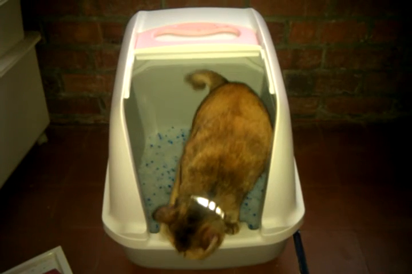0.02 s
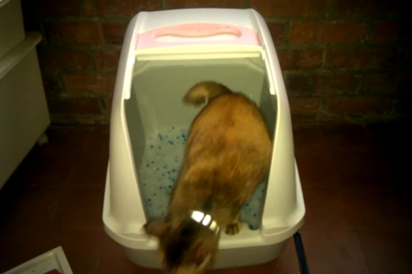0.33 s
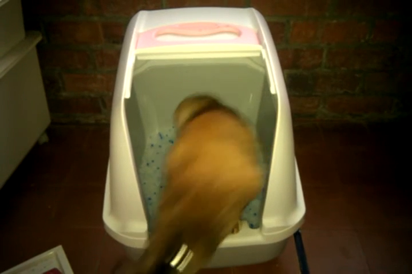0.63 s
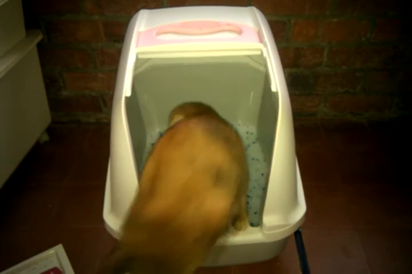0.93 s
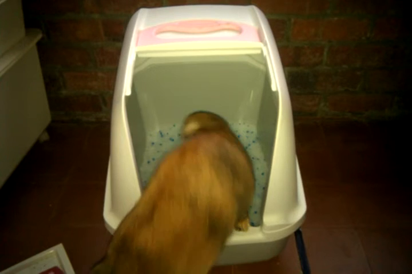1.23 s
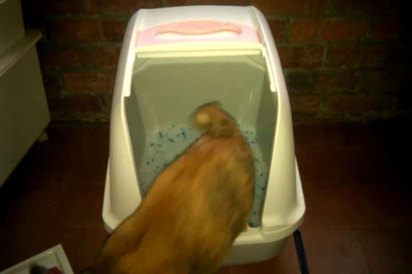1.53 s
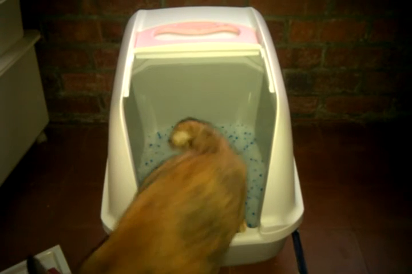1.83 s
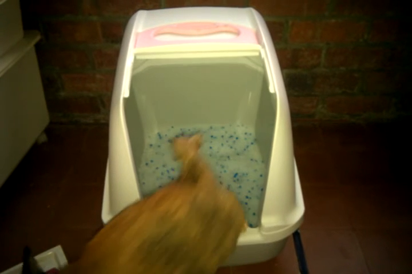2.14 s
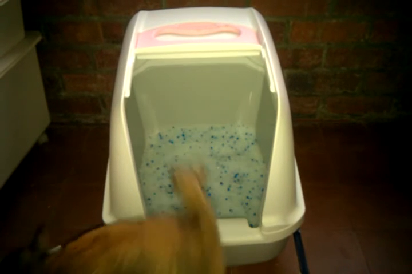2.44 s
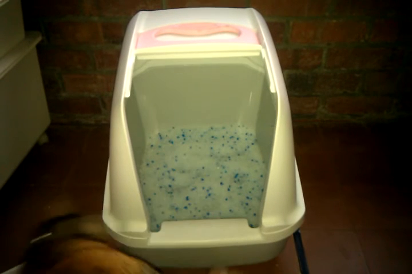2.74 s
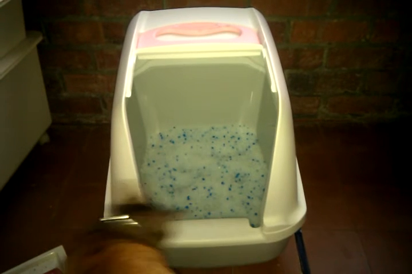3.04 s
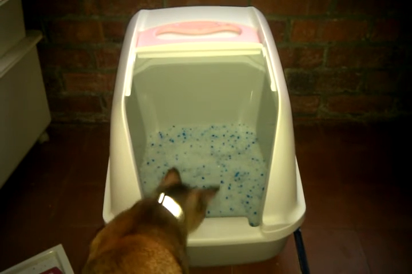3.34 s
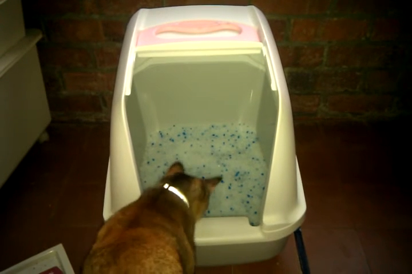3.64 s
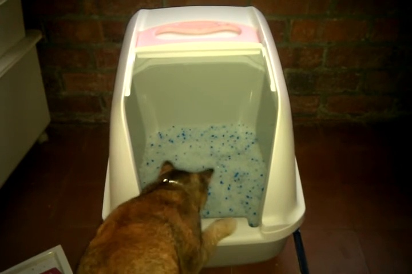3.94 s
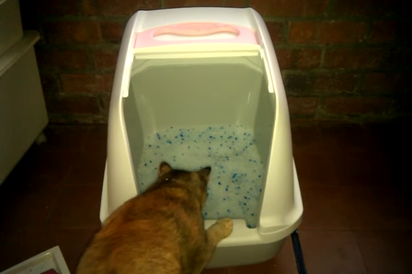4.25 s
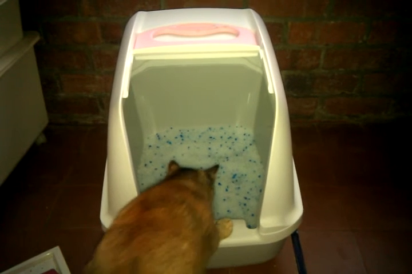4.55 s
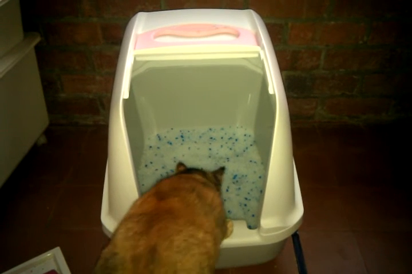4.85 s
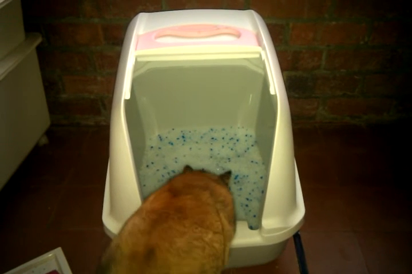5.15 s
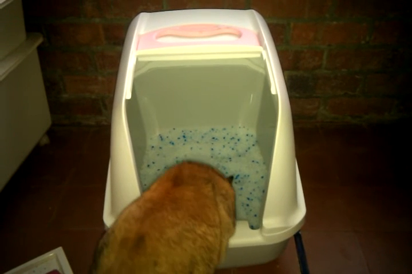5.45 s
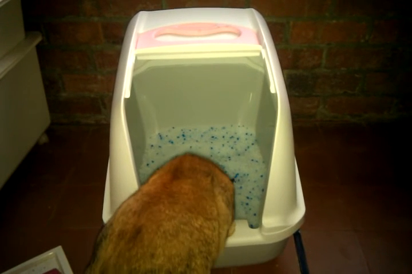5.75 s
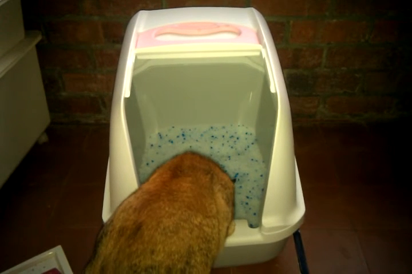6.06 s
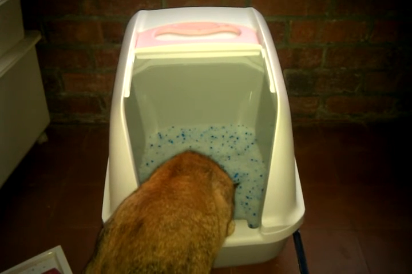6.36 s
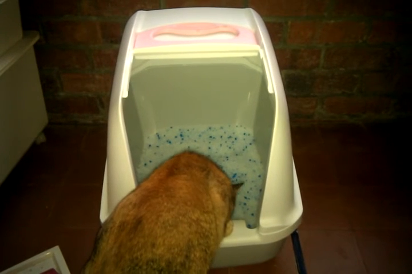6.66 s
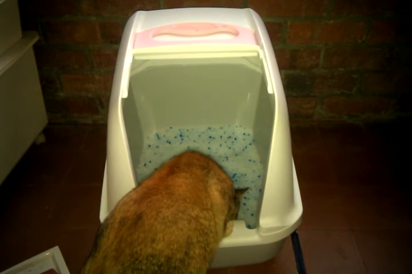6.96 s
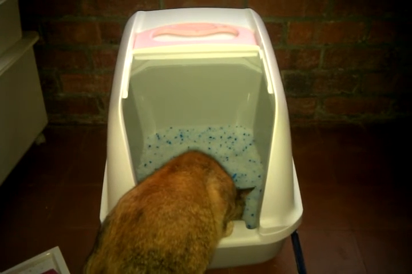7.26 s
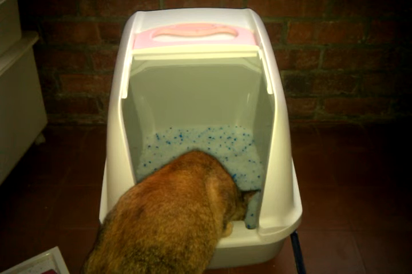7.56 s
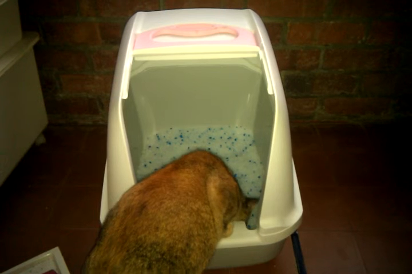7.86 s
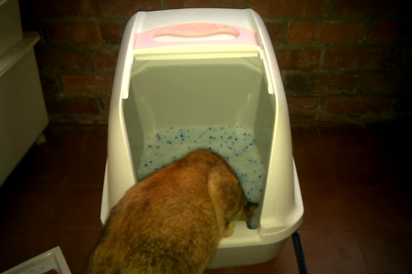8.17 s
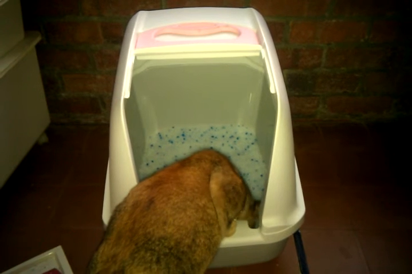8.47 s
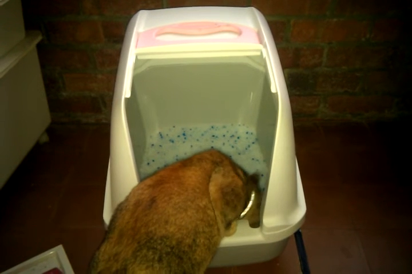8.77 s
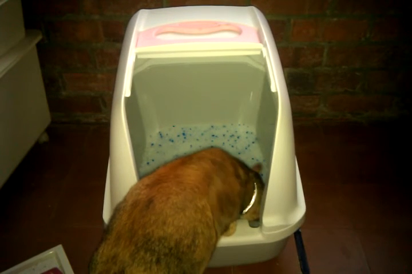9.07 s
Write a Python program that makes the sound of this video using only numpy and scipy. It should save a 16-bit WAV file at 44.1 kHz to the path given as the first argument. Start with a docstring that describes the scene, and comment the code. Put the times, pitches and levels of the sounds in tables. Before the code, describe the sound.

Litter crunches under a cat's paws, then a plastic tray knocks softly and claws rake it with a loud squeaky scrape, over a low hum.

```python
"""Cat litter crunches and ticks close by as a cat steps out through a hooded plastic box.
Granules rub and crack under its paws and echo in the hood; its fur brushes the rim. It turns round,
noses the tray, which knocks softly, and at the end rakes a paw along the wall, claws squeaking.
Behind it something like a fan hums in the room. The sound is mono, narrow and voice-band,
and the last, loudest stroke clips with a crackle."""
import sys
import numpy as np
from scipy import signal
from scipy.fft import rfft, irfft, next_fast_len
from scipy.io import wavfile
from scipy.ndimage import uniform_filter1d, minimum_filter1d, map_coordinates

SR = 44100
rng = np.random.default_rng(int(sys.argv[2]) if len(sys.argv) > 2 else 0)


def int16_out(signal):
    """Quantize to a 16-bit WAV file."""
    q = np.round(np.clip(np.atleast_2d(signal).T, -1, 1) * 32767)
    wavfile.write(sys.argv[1], SR, q.astype(np.int16))


N = 401751

# Levels are relative within each table.
# room tone, a steady rush of air: freq_hz, level_db
AIR_SPECTRUM = [(25, -27), (75, -12), (170, -9.5), (205, -1.5), (345, -1.5), (450, 3.5), (590, -1),
                (720, 0.5), (1030, 0), (1300, -5.5), (1700, -7), (2400, -9.5), (2850, -15), (3300, -16)]
# narrow bands of the hum: centre_hz, width_hz, level_db
HUM_BANDS = [(200.7, 11, -10), (213.9, 9.7, -2.5), (256.5, 17, -3.5), (300.5, 13, 2), (447.3, 8.6, -8),
             (512.4, 14, -5), (671.6, 36, -5)]
# the hum swells briefly: peak_s, level_db, rise_s, fall_s
HUM_SWELLS = [(3.92, -44.5, 0.25, 0.19), (5.7, -47.5, 1, 0.94), (7.57, -41, 0.25, 0.27)]
# the hum's strongest tone swells: peak_s, level_db, rise_s, fall_s
DRONE_SWELLS = [(1.36, -48, 0.27, 0.96), (2.72, -49.5, 0.94, 0.86)]
# fur over the rim as the cat climbs out: peak_s, level_db, rise_s, fall_s
FUR_BRUSHES = [(1.28, -43, 0.3, 0.33), (1.75, -43.5, 0.31, 0.36), (2.15, -44, 0.36, 0.42),
               (2.85, -45.5, 0.3, 0.27)]
# its hollow colour in the mouth of the hood: freq_hz, level_db
FUR_SPECTRUM = [(200, -26.5), (550, -15.5), (670, 4), (780, -5.5), (1050, -3), (1400, -11), (3500, -31.5)]
# the cat's weight coming down on the tray: start_s, level_db
PAW_THUDS = [(0.263, -37), (0.43, -47), (0.55, -57), (0.984, -45.5)]
# soft bumps against the tray: start_s, level_db
TRAY_KNOCKS = [(1.197, -31.5), (5.328, -30.5), (5.409, -37), (5.428, -26.5), (5.445, -29), (5.487, -19.5),
               (8.828, -22)]
# the tray's modes: pitch_hz, level_db, t60_s
TRAY_MODES = [(714, -4.5, 0.066), (795, -1.5, 0.028), (940, -6, 0.041), (1440, -10, 0.027),
              (1740, -17, .03)]
# claws squeaking on plastic: start_s, level_db, length_s, start_hz, end_hz
CLAW_SQUEAKS = [(8.865, -23, 0.022, 2640, 2730), (8.914, -10, 0.016, 1913, 1960),
                (8.943, -14, 0.02, 1990, 1950), (8.962, -10.5, 0.025, 1544, 1720),
                (8.984, -14, 0.042, 1960, 1870), (9.041, -15, 0.02, 2680, 2560),
                (9.063, -19, 0.01, 1500, 1590)]
# force of the paw raking the wall: time_s, level_db
RAKE_FORCE = [(8.832, -37.5), (8.862, -26), (8.886, -15), (8.905, -13.5), (8.935, -9.5), (8.96, -4),
              (8.987, -4.5), (9.018, -11.5), (9.048, -10.5), (9.07, -15), (9.09, -10), (9.11, -16)]
# colour of claws on plastic: freq_hz, level_db
SCRAPE_SPECTRUM = [(30, -24), (100, -18.5), (500, -14), (750, -4), (1000, -6), (1250, -6.5), (1500, 1),
                   (2200, -0.5), (2800, 1), (3600, 3), (4000, 0.5)]
# resonances of the scraped wall: centre_hz, width_hz, level_db
WALL_RESONANCES = [(790, 49, -12.5), (1480, 160, -3.5), (1614, 60, -3), (1943, 84, 0), (2483, 57, 0.5),
                   (2900, 85, -9), (3280, 58, -11)]
# single granules cracking: start_s, level_db, pitch_hz, t60_s
GRANULE_SNAPS = [(0.271, -20, 3000, 0.016), (0.342, -22, 2040, 0.018), (0.4176, -15, 1840, 0.035),
                 (0.507, -17, 3210, 0.045), (0.531, -15, 2400, 0.02), (0.5635, -13, 1790, 0.012),
                 (0.5727, -16.5, 1676, 0.046), (0.576, -16, 3230, 0.03), (0.5983, -13.5, 3060, 0.012),
                 (0.616, -18, 2210, 0.013), (0.697, -25.5, 2150, 0.02), (0.8664, -26.5, 3120, 0.025),
                 (0.8939, -26, 1950, 0.032), (0.951, -23.5, 2810, 0.02), (1.0035, -28, 1920, 0.022),
                 (1.0167, -18, 3210, 0.019), (1.0292, -16, 1880, 0.0107), (1.1992, -20.5, 1760, 0.0069),
                 (1.3553, -27.5, 3000, 0.027), (5.327, -32.5, 3220, 0.018)]
# a paw or the nose presses into the litter and eases off: peak_s, level_db, rise_s, fall_s
LITTER_PUSHES = [(0.052, -39.5, 0.092, 0.13), (0.2, -26.5, 0.054, 0.19), (0.268, -20, 0.048, 0.085),
                 (0.348, -25.5, 0.033, 0.08), (0.422, -19.5, 0.056, 0.14), (0.512, -21, 0.062, 0.13),
                 (0.575, -19.5, 0.06, 0.11), (0.66, -33.5, 0.033, 0.079), (0.704, -32.5, 0.035, 0.11),
                 (0.875, -34.5, 0.14, 0.25), (0.962, -31.5, 0.05, 0.049), (1.031, -23.5, 0.049, 0.042),
                 (1.07, -40, 0.047, 0.31), (1.36, -36.5, 0.25, 0.22), (1.59, -42.5, 0.076, 0.2),
                 (2.355, -35, 0.031, 0.037), (7.06, -48, 0.027, 0.13), (7.24, -48.5, 0.14, 0.15),
                 (7.655, -47.5, 0.044, 0.032)]
# clumps giving way and loose granules landing: start_s, level_db, t60_s
CLUMP_CRUNCHES = [(0.047, -18.5, 0.08), (0.257, -25, 0.1), (0.401, -7.5, 0.097), (0.442, -5.5, 0.092),
                  (0.4945, -16.5, 0.066), (0.529, -16, 0.05), (0.561, -7, 0.038), (0.591, -12, 0.037),
                  (0.617, -16, 0.05), (0.9492, -21.5, 0.066), (1.0046, -27, 0.06), (1.027, -20, 0.059),
                  (1.197, -17.5, 0.014), (1.351, -22, 0.051), (1.584, -22.5, 0.059), (5.3234, -22, 0.043),
                  (8.828, -7.5, 0.019)]
# colour of the granules: freq_hz, level_db
LITTER_SPECTRUM = [(30, -26), (120, -12.5), (300, -19.5), (550, -3.5), (800, -2), (1200, -3.5), (1800, 4),
                   (2400, 1), (3100, 1), (4000, 1)]
# the bright ring of fine grit: centre_hz, width_hz, level_db
GRIT_RESONANCE = [(3300, 610, 0)]
# the narrow voice band, its treble cut steeply: freq_hz, gain_db
VOICE_BAND = [(3250, 1.5), (3500, -6.5), (3750, -13.5), (4000, -19), (4400, -34.5), (4600, -48),
              (4850, -110)]


def amp(db):
    """Decibels to gain."""
    return 10 ** (np.asarray(db) / 20)


def unit(x):
    """Scale to rms 1."""
    return x / np.sqrt(np.mean(x ** 2) + 1e-20)


def gain(points, hz):
    """Gain of (freq_hz, level_db) points joined on a log axis."""
    f, db = np.transpose(points)
    return amp(np.interp(np.log(hz + 1), np.log(f + 1), db))


def filtered(x, response):
    """x shaped by a frequency response."""
    size = next_fast_len(len(x) + SR // 2)
    return irfft(rfft(x, size) * response(np.fft.rfftfreq(size, 1 / SR)), size)[:len(x)]


def coloured(x, points):
    """x shaped by the given spectrum, at rms 1."""
    return unit(filtered(x, lambda hz: gain(points, hz)))


def resonant(x, peaks):
    """x through (centre_hz, width_hz, level_db) resonances, at rms 1."""
    def response(f):
        return sum(amp(db) * 1j * f * width / (hz * hz - f * f + 1j * f * width)
                   for hz, width, db in peaks)
    return unit(filtered(x, response))


def add(track, start_s, sound):
    """Mix a sound in at start_s."""
    part = track[max(round(start_s * SR), 0):][:len(sound)]
    part += sound[:len(part)]


def wobble(rate):
    """A smooth random curve, rate knots a second."""
    return map_coordinates(rng.standard_normal(int(N * rate / SR) + 4), [np.arange(N) * rate / SR])


def swells(rows, roundness, range_db=20.5):
    """Gain of events that grow range_db in rise_s and lose it in fall_s; roundness 1 is pointed."""
    t, power = np.arange(N) / SR, np.zeros(N)
    for peak_s, db, rise_s, fall_s in rows:
        away = np.maximum((peak_s - t) / rise_s, (t - peak_s) / fall_s)
        power += amp(db - range_db * away ** roundness) ** 2
    return np.sqrt(power)


def grains(rate, spread_db):
    """Tiny random impacts, rate a second, their sizes scattered by spread_db."""
    chance, size = rng.random(N), rng.standard_normal(N)
    return (chance < rate / SR) * rng.choice([-1, 1], N) * amp(spread_db * np.clip(size, -2, 2))


def hood(x, t60_s, wet_db):
    """Dense short echoes inside the hood; they keep changing, as when the cat moves."""
    out, t = x.copy(), np.arange(SR // 6) / SR
    block = SR // 12
    for start in range(0, N, block):
        tail = rng.standard_normal(len(t)) * amp(-60 * t / t60_s) * (t > 0.0015)
        echoes = signal.fftconvolve(x[start:start + block], tail / np.linalg.norm(tail))
        add(out, start / SR, amp(wet_db) * echoes)
    return out


def room_tone():
    """Behind the box: moving air, a fuzzy hum that creeps up, and a wavering tone that swells twice."""
    def bands(f):
        return sum(amp(db) / (1 + (2 * (f - hz) / width) ** 2) for hz, width, db in HUM_BANDS)
    air = amp(-38.5 + 0.5 * wobble(rate=30)) * coloured(rng.standard_normal(N), AIR_SPECTRUM)
    hum_db = np.interp(np.arange(N) / SR, [0, 5.1], [-48.5, -44]) + 0.2 * wobble(rate=1.3)
    hum_gain = np.hypot(amp(hum_db), swells(HUM_SWELLS, roundness=1.6))
    hum = hum_gain * unit(filtered(rng.standard_normal(N), bands))
    pitch_hz = 408.7 + 4 * wobble(rate=25)
    tone = unit(np.sin(2 * np.pi * np.cumsum(pitch_hz) / SR) * amp(2.8 * wobble(rate=14)))
    drone = (amp(-52) + swells(DRONE_SWELLS, roundness=1.6)) * tone
    return air + hum + drone


def fur():
    """At the mouth of the hood the cat's flank slides over the rim with a soft, hollow rustle."""
    return swells(FUR_BRUSHES, roundness=2) * coloured(rng.standard_normal(N), FUR_SPECTRUM)


def thuds(bottom_hz=110):
    """A soft paw gives the tray's bottom one dull, quickly damped push."""
    out, t = np.zeros(N), np.arange(SR // 5) / SR
    attack_s, t60_s = 0.0033, 0.048
    envelope = amp(-60 * t / t60_s) * (1 - np.exp(-t / attack_s))
    for start_s, db in PAW_THUDS:
        pitch_hz = bottom_hz * rng.uniform(0.74, 1.4)
        add(out, start_s, amp(db + 9) * envelope * np.sin(2 * np.pi * pitch_hz * t))
    return out


def knocks(attack_s=0.0007):
    """The tray, damped by its load of litter, answers each bump briefly."""
    out, t = np.zeros(N), np.arange(SR // 5) / SR
    for start_s, db in TRAY_KNOCKS:
        ring = sum(amp(mode_db + rng.normal(0, 1) - 60 * t / t60_s) * np.sin(2 * np.pi * hz * t)
                   for hz, mode_db, t60_s in TRAY_MODES)
        add(out, start_s, amp(db + 0.5) * ring * (1 - np.exp(-t / attack_s)))
    return out


def squeaks(jitter=0.02):
    """A claw sticks and slips on the plastic for a moment: a rough, gliding tone."""
    out, t = np.zeros(N), np.arange(N) / SR
    for start_s, db, length_s, start_hz, end_hz in CLAW_SQUEAKS:
        along = np.clip((t - start_s) / length_s, 0, 1)
        pitch_hz = (start_hz + (end_hz - start_hz) * along) * (1 + jitter * wobble(rate=400))
        out += amp(db) * np.sin(np.pi * along) * np.sin(2 * np.pi * np.cumsum(pitch_hz) / SR)
    return out


def rake():
    """A juddering paw drags granules over the plastic wall, which rasps and rings inside the hood."""
    time_s, db = np.transpose(RAKE_FORCE)
    judder_db = 1.8 * wobble(rate=120)
    force = amp(np.interp(np.arange(N) / SR, time_s, db, left=-120) + judder_db)
    rasp = amp(3.5) * coloured(grains(rate=14000, spread_db=0.5), SCRAPE_SPECTRUM)
    contacts = grains(rate=6000, spread_db=2)
    ring = unit(sum(amp(level_db) * resonant(contacts, [(hz, width, 0)])
                    for hz, width, level_db in WALL_RESONANCES))
    return hood(force * (rasp + amp(-8.5) * ring), t60_s=0.036, wet_db=-10.5)


def snaps():
    """A granule cracks under the paw: a dry click and a short ring, roughened by its straying phase."""
    out, t = np.zeros(N), np.arange(SR // 10) / SR
    stray_rad, stray_rate = 0.72, 1800
    attack_s, crack_t60_s = 0.00029, 0.0067
    for start_s, db, pitch_hz, t60_s in GRANULE_SNAPS:
        stray = stray_rad * np.interp(t * stray_rate, np.arange(256), rng.standard_normal(256))
        ring = np.sin(2 * np.pi * pitch_hz * t + stray) * amp(-60 * t / t60_s)
        crack = rng.standard_normal(len(t)) * amp(-2 - 60 * t / crack_t60_s)
        add(out, start_s, amp(db) * (ring + crack) * (1 - np.exp(-t / attack_s)))
    return hood(out, t60_s=0.04, wet_db=-9)


def litter(attack_s=0.00041):
    """Granules rub and clumps give way under the paws: the harder the push, the more granules move."""
    steps = swells(LITTER_PUSHES, roundness=1.15)
    stir = amp(-52 + 2.5 * wobble(rate=26))  # faint shifting under the standing cat
    push = np.hypot(steps, stir)
    effort = push / push.max()
    rate = 1800 + 4500 * effort
    rubbing = amp(7) * push * coloured(grains(rate, spread_db=4.5) / np.sqrt(rate), LITTER_SPECTRUM)
    grit_gain = steps * amp(-8 + 4 * effort)
    grit = grit_gain * resonant(grains(rate=1200, spread_db=5.5), GRIT_RESONANCE)
    collapse, t = np.zeros(N), np.arange(SR // 4) / SR
    for start_s, db, t60_s in CLUMP_CRUNCHES:
        add(collapse, start_s, amp(db - 60 * t / t60_s) * (1 - np.exp(-t / attack_s)))
    crunch = amp(-4.5) * collapse * coloured(grains(rate=3300, spread_db=0), LITTER_SPECTRUM)
    return hood(rubbing + grit + crunch, t60_s=0.024, wet_db=-7)


def scene():
    """The cat at its box in front, the humming room behind, in mono."""
    return (litter() + snaps() + rake() + squeaks() + knocks() + thuds() + room_tone() + fur())[None]


def record(dry):
    """The sound is narrowed to the voice band; loud peaks are held down, and their tips clip."""
    narrow = filtered(dry[0], lambda hz: gain(VOICE_BAND, hz))
    # the level dips for a few milliseconds round each peak, taking off a share of the excess dB
    limit_db, share, window = -2.5, 0.67, 120
    needed = np.minimum(1, amp(limit_db) / (np.abs(narrow) + 1e-9)) ** share
    limiter_gain = uniform_filter1d(minimum_filter1d(needed, size=window), size=window)
    clipped = np.clip(narrow * limiter_gain, -0.72, 0.72)
    lowpass = signal.butter(16, 16000, fs=SR, output="sos")
    return signal.sosfilt(lowpass, clipped)[None]


dry = scene()
out = record(dry)
int16_out(out)
```